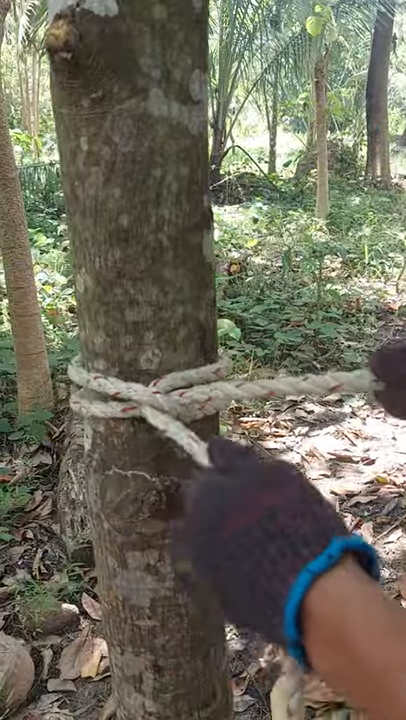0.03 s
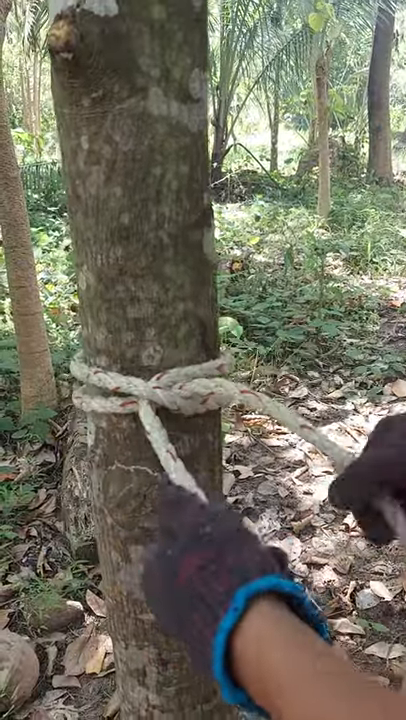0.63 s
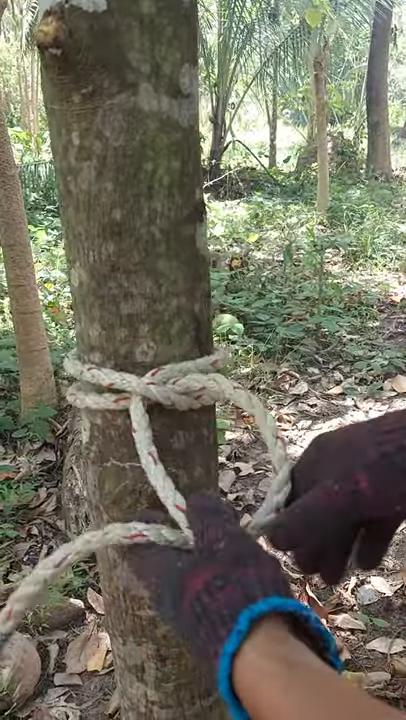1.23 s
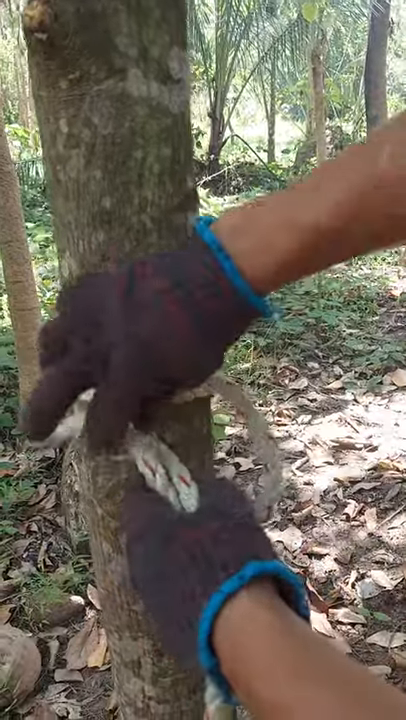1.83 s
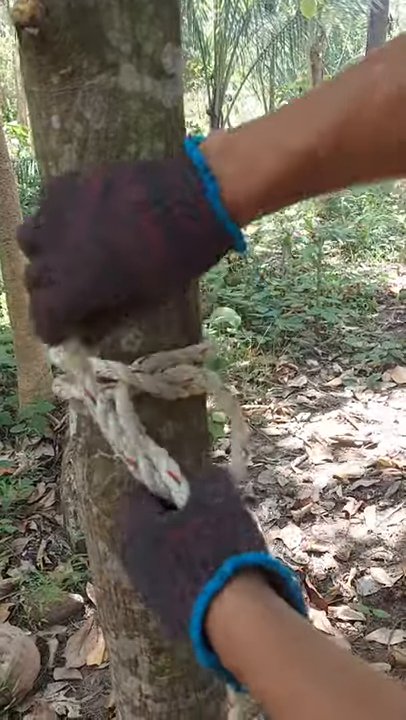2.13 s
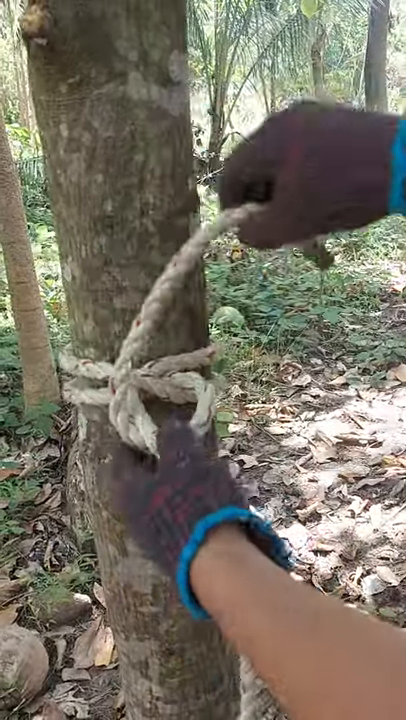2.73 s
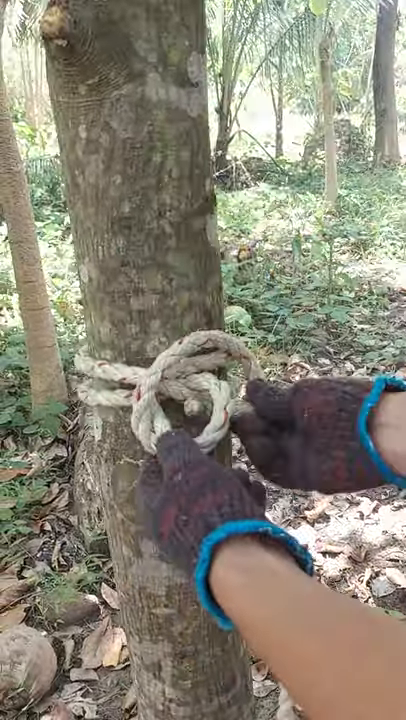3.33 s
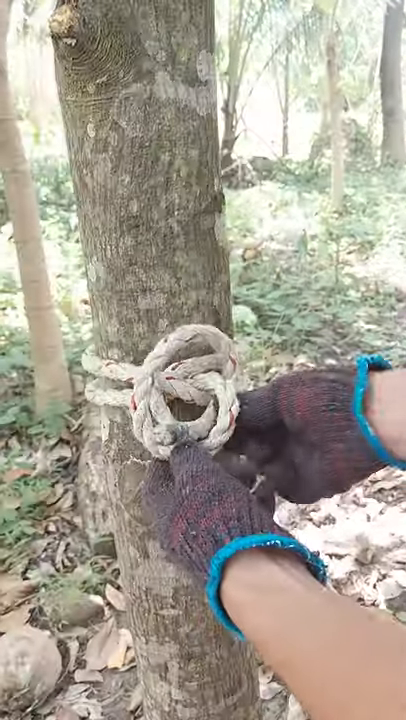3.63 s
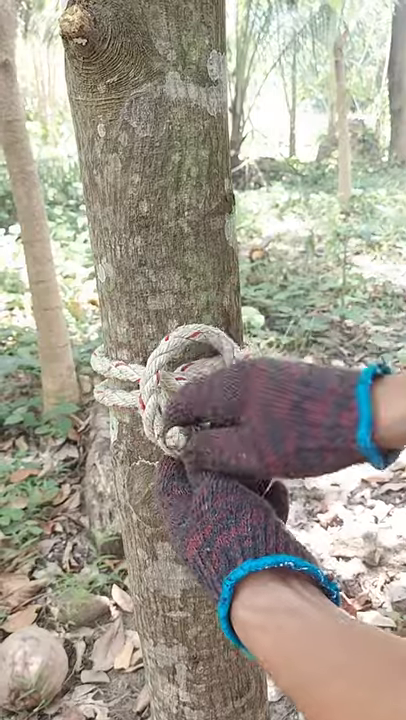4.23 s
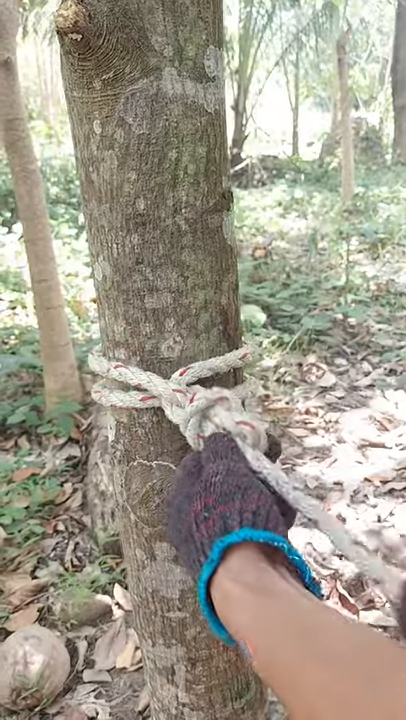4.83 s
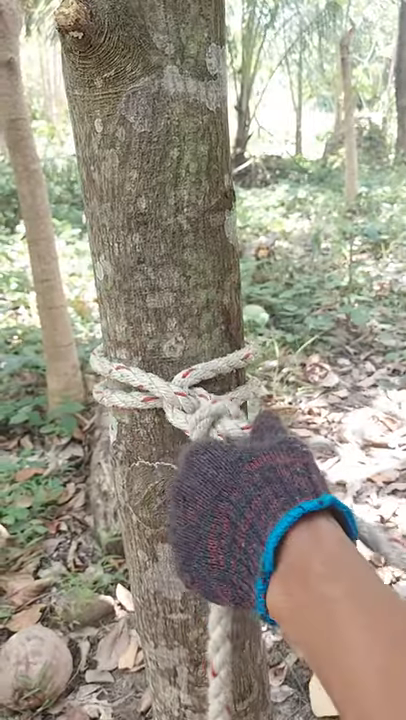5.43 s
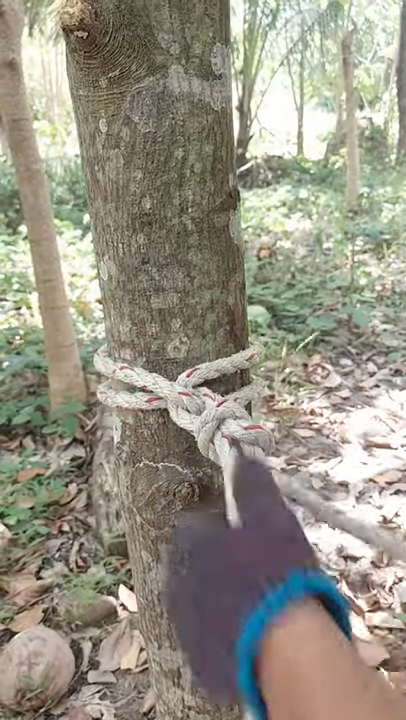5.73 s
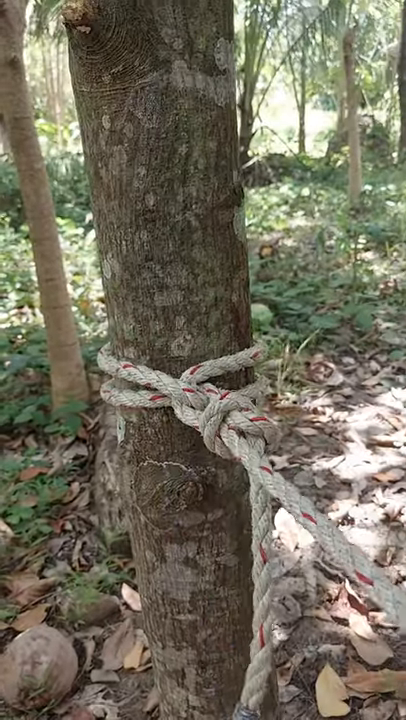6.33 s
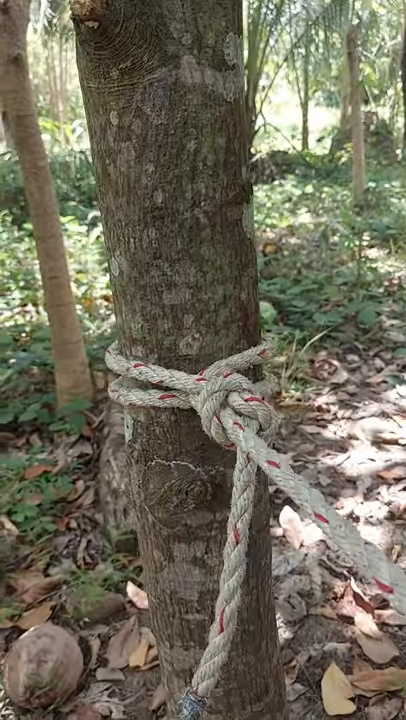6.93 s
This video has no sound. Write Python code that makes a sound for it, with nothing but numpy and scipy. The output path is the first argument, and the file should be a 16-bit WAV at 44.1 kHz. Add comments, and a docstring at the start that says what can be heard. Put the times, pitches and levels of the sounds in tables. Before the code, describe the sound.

Outdoors in a grove, air gives the microphone a few soft bumps while a distant engine, likely a motorbike, putters low. It revs in short bursts, fastest around the middle, then eases back. Nearby, gloved hands tie a rope round a trunk, making quiet rubs, swishes and small snaps that come more often as it tightens. Leaves hiss steadily, with faint insects and far birds.

```python
"""A low putter, revved in short bursts: a single-cylinder engine some way off, probably a motorbike.
Each firing rings its silencer and tailpipe, and only this low exhaust carries.
Close by, a rope is knotted round a tree: it rubs on bark and gloves and its fibres tick.
Behind, a grove's leaves hiss, insects and far birds call faintly; air now and then bumps the microphone."""
import sys
import numpy as np
from scipy import signal
from scipy.fft import rfft, irfft, next_fast_len
from scipy.io import wavfile
from scipy.ndimage import map_coordinates

SR = 44100
rng = np.random.default_rng(int(sys.argv[2]) if len(sys.argv) > 2 else 0)


def wav_out(sig):
    """Save sig, one row per channel (or a flat mono array), as 16-bit PCM at SR to the path in sys.argv[1]."""
    wavfile.write(sys.argv[1], SR, np.round(np.clip(np.atleast_2d(sig).T, -1, 1) * 32767).astype(np.int16))


N = 317079


def engine(gas_db=-21, wash_db=-12, roar_db=-17.5, rasp_db=5, load_hz=13, lead_s=0.00449):
    """Each firing rings silencer and tailpipe; an open throttle sharpens the puff into a bark."""
    # engine speed: t/s, firing rate/Hz
    revs = [(0, 22.0), (.47, 24.7), (.87, 15.7), (1.66, 18.1), (2.29, 22.4), (2.57, 31.1), (2.84, 27.3),
            (2.99, 32.3), (3.31, 23.7), (3.62, 34.3), (3.9, 33.0), (4.05, 36.2), (4.22, 30.4), (4.44, 30.1),
            (4.86, 17.6), (5.27, 22.6), (5.54, 20.8), (6.48, 25.8), (6.88, 16.9), (7.19, 17.0)]
    # tone of one sharp firing: f/Hz, level/dB
    bark_tone = [(30, -51.5), (70, -6), (110, -10.5), (145, 6), (170, 1.5), (200, -2.5), (222, -7.5),
                 (250, -6), (278, -22.5), (335, -19.5), (400, -24.5), (500, -33.5), (1200, -71)]
    # tailpipe resonance: f/Hz, level/dB
    pipe_tone = [(100, -48.5), (170, -20), (200, -3.5), (214, 11), (238, 2), (254, -5.5), (290, -41.5),
                 (500, -82)]
    # fader ride on the tailpipe's hum: t/s, level/dB
    hum_ride = [(0, -47.5), (.7, -51.5), (.9, -58.5), (1.5, -43), (2.1, -47), (2.6, -47), (3.2, -58),
                (3.65, -37.5), (4.0, -35.5), (4.2, -56), (5, -63), (6.4, -45), (6.85, -60)]
    rate, = curves(revs)
    hum_db, = curves(hum_ride)
    boom_db, bark_db, boom_hz = exhaust(rate)
    load = np.clip((bark_db - boom_db + 11) / 9, 0, 1)
    cycle = np.cumsum(rate) / SR + .5
    fired = np.flatnonzero(np.diff(np.floor(cycle)))
    unevenness = amp(-7 * load[fired])  # under load the firings are more alike
    timing, force, detune = rng.standard_normal((len(fired), 3)).T * unevenness
    at = fired + .00045 * timing * SR
    strength = amp(1.9 * force)
    notes_hz = boom_hz[fired] + load_hz * load[fired] + 3.5 * detune
    boom = held(silencer(at, strength, notes_hz, load[fired]), boom_db)
    onsets = np.clip(at - lead_s * SR, 0, N - 1).astype(int)
    pulses = unit(np.bincount(onsets, -strength, N))
    gush = unit(np.exp(-2.5 * (cycle % 1)))  # turbulent gas follows each puff out of the pipe
    gas = amp(gas_db) * gush * rng.standard_normal(N)
    bark = held(ringing(pulses + gas, bark_tone), bark_db)
    hum = held(ringing(pulses, pipe_tone), hum_db - 3)
    # trunks and ground scatter a dull wash between the puffs
    wash = hiss([(25, -56), (55, -12), (82, -13), (200, -9), (280, -28), (600, -38.5), (2000, -70)])
    wash = amp(boom_db + wash_db) * wash.mean(axis=0)
    roar = hiss([(60, -15), (200, 16), (330, -12.5), (400, -1.5), (480, -12), (630, -6.5),
                 (800, -13.5), (1200, -14), (2400, -23), (5000, -55)])
    roar *= amp(bark_db + roar_db + rasp_db * load) * (1 + 0.64 * gush)
    return (boom + bark + hum + wash) * amp([[-.4], [.4]]) + roar


def silencer(at, sizes, hz, load, idle_life_s=0.0072, load_life_s=0.0063, lead_s=0.0097):
    """Each puff sets the silencer swinging for a few cycles; strong gas flow damps it sooner."""
    out, t = np.zeros(N), np.arange(SR // 8) / SR
    lives = idle_life_s + load * (load_life_s - idle_life_s)
    for s, size, f, life in zip(at / SR, sizes, hz, lives):
        envelope = (t / life) ** 2 * np.exp(-t / life)
        add(out, s - lead_s, size * envelope * np.cos(2 * np.pi * f * (t - lead_s)))
    return out


def exhaust(rate, cruise_hz=20, pull_hz=27, full_hz=34.4):
    """Revs lift level and pitch; a wide throttle trades boom for bark, a boom swell does the reverse."""
    # how hard the engine pulls, as gain on the bark: t/s, level/dB
    effort = [(0, -3.5), (.6, -3), (1.4, -1.5), (2.0, 5), (2.55, 4), (3.3, 0), (4.0, 1.5), (4.5, 0),
              (5.05, -1), (5.7, 4.5), (6.3, 2), (6.8, -1), (7.19, -2.5)]
    effort_db, = curves(effort)
    octaves = np.log2(rate / cruise_hz)
    surge, sag_hz = booming()
    wide = np.clip((rate - pull_hz) / (full_hz - pull_hz), 0, 1) * np.clip(1 - surge, 0, 1)
    boom_db = -35.5 + 8.5 * octaves + 0.47 * effort_db - 14 * wide + 5 * surge
    bark_db = -48.5 + 12 * octaves + effort_db + 3.5 * wide - 3.5 * surge
    boom_hz = 113.5 + 17 * octaves - sag_hz
    return boom_db, bark_db, boom_hz


def booming(attack_s=0.022, release_s=0.046):
    """The low boom swells where the throttle eases or the firings meet the silencer's resonance."""
    # swells of the low boom: t/s, length/s, depth/0-1, pitch sag/Hz
    boom_swells = [(1.807, 0.22, 0.68, 3), (2.713, 0.2, 0.75, 23), (2.993, 0.31, 0.79, 19),
                   (4.089, 0.19, 0.8, 23.5), (4.405, 0.24, 0.84, 12), (6.15, 0.17, 0.86, -6),
                   (6.54, 0.23, 0.55, 22)]
    t, surge, sag_hz = np.arange(N) / SR, np.zeros(N), np.zeros(N)
    for s, length, depth, fall_hz in boom_swells:
        envelope = np.clip(np.minimum((t - s) / attack_s, (s + length - t) / release_s) + .5, 0, 1)
        surge += depth * envelope
        sag_hz += fall_hz * envelope * (t - s) / length
    return surge, sag_hz


def rope(grain_db=2.0, handling_db=-74):
    """Strands catch and slip: a coarse rub on the bark and a fine swish through the glove."""
    # pulls on the rope: t/s, length/s, rub level/dB, swish level/dB
    strokes = [(0.733, 0.088, -52, -56.5), (1.696, .12, -61, -69), (3.268, 0.28, -60, -76),
               (4.37, 0.45, -61, -68), (4.68, 0.39, -61, -61.5), (5.22, 0.18, -63, -65),
               (5.515, 0.16, -72, -57.5), (5.972, 0.19, -50, -51.5), (6.09, 0.25, -59.5, -60),
               (6.274, 0.29, -58.5, -59), (6.53, 0.22, -61, -63), (6.813, 0.29, -64, -54.5)]
    # tone of rope on bark: f/Hz, level/dB
    rub_tone = [(300, -15), (800, 3.5), (1600, 8.5), (2500, 6), (3500, 6), (5000, 4), (8000, -1),
                (15000, -47)]
    # tone of rope through the glove: f/Hz, level/dB
    swish_tone = [(1500, -30), (5000, -7), (8000, -6), (11000, -5.5), (14000, -6), (16000, -6.5)]
    rub = np.zeros(N)
    swish = amp(handling_db + 1.4 * wobble(5.5))  # the gloves never quite rest
    for s, length, rub_db, swish_db in strokes:
        stroke = swell(length, skew=0.59)
        add(rub, s, amp(rub_db) * stroke)
        add(swish, s, amp(swish_db) * stroke)
    catching = unit(amp(grain_db * wobble(600) + wobble(90) + wobble(25)))
    return catching * (rub * hiss(rub_tone) + swish * hiss(swish_tone)) * amp([[-2], [2]])


def ticks(faint_per_s=7, faint_db=-60.5, spread_db=9.5, faint_hz=9000):
    """Tiny dry snaps, each a resonance that dies at once; fainter ones come at random."""
    # snapping fibres and dry leaves: t/s, level/dB, f/Hz, width/Hz
    snaps = [(0.744, -43, 1500, 3000), (.749, -43, 3300, 700), (0.973, -48, 1190, 1000),
             (1.472, -42.5, 3450, 700), (1.476, -41.5, 5500, 1810), (1.495, -40.5, 3970, 2820),
             (1.506, -48, 6600, 1500), (2.119, -46, 1480, 2000), (4.387, -51, 8500, 6000),
             (4.743, -50, 9000, 8000), (5.539, -49, 13000, 6000), (6.021, -44, 9000, 14000),
             (6.069, -45, 4060, 2000), (6.105, -46.5, 4500, 1800), (6.333, -48, 11500, 4000),
             (6.425, -45, 7900, 7000), (6.777, -55, 11900, 8000)]
    out, t = np.zeros((2, N)), np.arange(SR // 8) / SR
    chance = rng.uniform(-1, 1, (int(faint_per_s * N / SR), 3))
    faint = [(abs(when) * N / SR, faint_db + spread_db * force, faint_hz * 2 ** (pitch / 2), faint_hz)
             for when, force, pitch in chance]
    for s, db, hz, width in snaps + faint:
        t60 = 0.029 * np.sqrt(4000 / hz)  # higher ticks die sooner
        add(out, s, amp(db - 60 * t / t60) * band(len(t), hz, width))
    return out * amp([[-2], [2]])


def air_bumps(draught_db=-58):
    """Air stirs at the microphone, mostly on the left, and now and then gives a soft low push."""
    # pushes of air: t/s, length/s, f/Hz, level/dB
    pushes = [(0, 0.15, 76, -27.5), (0.528, 0.09, 54, -35), (1.631, 0.36, 59, -39.5),
              (2.189, 0.077, 63, -35)]
    stirring = amp(draught_db + 2.5 * wobble(4))
    out = stirring * hiss([(20, -26), (45, 8), (90, -1), (200, -7), (500, -34)])
    for s, length, hz, db in pushes:
        push = unit(band(int(length * SR), hz, width=0.59 * hz)[0])
        add(out, s, amp(db) * swell(length, skew=0.75) * push)
    return out * amp([[4], [-9]])


def grove(chorus_db=-67.5):
    """Leaves hiss all round, and the insect chorus shimmers in a narrow band."""
    # fader ride on the leaves: t/s, level/dB
    leaf_ride = [(0, -53.5), (1.2, -57), (2.1, -55), (4.1, -57.5), (5.3, -58.5), (7.19, -59.5)]
    # tone of the leaves: f/Hz, level/dB
    leaf_tone = [(25, 10), (100, 18.5), (300, 4), (500, -2.5), (900, -1.5), (1350, -2.5), (1900, -2),
                 (2500, -3.5), (3200, -6.5), (4700, -8), (6200, -12.5), (9000, -16), (12000, -20),
                 (15800, -31.5)]
    ride_db, = curves(leaf_ride)
    flutter = amp(.4 * wobble(7))
    leaves = amp(ride_db + 9.5) * flutter * hiss(leaf_tone)
    shimmer = amp(chorus_db + wobble(25))
    chorus = shimmer * hiss([(5500, -54), (6550, -11), (6950, 1), (7300, 0), (7850, -6), (9500, -35)])
    return (leaves + chorus) * amp([[-.7], [.7]])


def calls(chirp_s=0.22, chirp_width_hz=900, trill_s=0.33, trill_hz=4580, trill_width_hz=220):
    """Insects and far birds call in brief swells of narrow-band noise."""
    # an insect chirping over the chorus: t/s, f/Hz, level/dB
    chirp_cues = [(0, 7270, -62), (.59, 7100, -63), (1.0, 7300, -68), (1.59, 6900, -62), (2.09, 7100, -62),
                  (2.5, 7100, -65), (2.67, 7300, -61), (3.23, 7100, -64), (4.641, 7200, -60),
                  (6.09, 7350, -64), (6.53, 6900, -58.5)]
    # a lower, narrower trill: t/s, level/dB
    trill_cues = [(0, -62), (2.68, -64), (4.68, -62), (6.11, -62)]
    # faint calls, probably far birds and insects: t/s, length/s, f/Hz, width/Hz, level/dB
    far_calls = [(2.22, .12, 15200, 900, -68), (3.601, 1, 2370, 220, -63), (6.549, 0.21, 2330, 450, -62),
                 (6.579, 0.38, 930, 250, -62), (6.895, 0.2, 2140, 454, -62)]
    out = np.zeros((2, N))
    chirps = [(s, chirp_s, hz, chirp_width_hz, db) for s, hz, db in chirp_cues]
    trills = [(s, trill_s, trill_hz, trill_width_hz, db) for s, db in trill_cues]
    for s, length, hz, width, db in chirps + trills + far_calls:
        add(out, s, amp(db) * swell(length, skew=0.76) * band(int(length * SR), hz, width))
    return out


def squeak(waver_hz=90):
    """One thin, very high tone glides up and back, wavering as it goes."""
    # the glide: t/s, f/Hz, level/dB
    glide = [(4.91, 12400, -100), (4.95, 12550, -66), (5.01, 12650, -68), (5.065, 13650, -70),
             (5.095, 12600, -75), (5.11, 12400, -100)]
    pitch_hz, db = curves(glide)
    sounding = db > max(db[0], db[-1])
    phase = 2 * np.pi * np.cumsum(pitch_hz + waver_hz * wobble(700)) / SR
    return sounding * amp(db) * np.sin(phase)


def amp(db):
    """Decibels to gain."""
    return 10 ** (np.asarray(db) / 20)


def unit(x):
    """x brought to rms 1."""
    return x / np.sqrt(np.mean(x ** 2) + 1e-20)


def along(points, hz):
    """Read (Hz, value) points on a log frequency axis."""
    f, v = np.transpose(points)
    return np.interp(np.log(hz + 1), np.log(f + 1), v)


def curves(rows):
    """One value per sample for each column after the time."""
    s, *cols = np.transpose(rows)
    return [np.interp(np.arange(N) / SR, s, c) for c in cols]


def wobble(rate):
    """A smooth random curve, rate knots a second."""
    return map_coordinates(rng.standard_normal(int(N * rate / SR) + 4), [np.arange(N) * rate / SR])


def filtered(x, response):
    """x through a zero-phase EQ whose gain is response(hz)."""
    m = next_fast_len(N + SR // 2, True)
    return irfft(rfft(x, m) * response(np.fft.rfftfreq(m, 1 / SR)), m)[..., :N]


def ringing(x, spectrum, size=16384):
    """x through a minimum-phase body with the given spectrum."""
    gain = amp(along(spectrum, np.fft.rfftfreq(size, 1 / SR)))
    cepstrum = irfft(np.log(gain))
    cepstrum[1:size // 2] *= 2
    cepstrum[size // 2 + 1:] = 0
    return signal.fftconvolve(x, irfft(np.exp(rfft(cepstrum))))[:N]


def hiss(spectrum):
    """Shaped stereo noise of rms 1, narrow in the bass and wide in the treble."""
    # stereo image: f/Hz, left-right correlation/0-1
    likeness = [(30, 0.52), (250, 0.8), (600, 0.34), (1200, 0), (10000, 0)]

    def mid_side_gains(hz):
        angle = np.arccos(np.clip(along(likeness, hz), -1, 1)) / 2
        return amp(along(spectrum, hz)) * [np.cos(angle), np.sin(angle)]

    mid, side = filtered(rng.standard_normal((2, N)), mid_side_gains)
    return unit(np.array([mid + side, mid - side]))


def band(n, hz, width):
    """n samples of stereo noise in one steep-sided resonance, rms about 1."""
    f = np.fft.rfftfreq(SR, 1 / SR)
    white = rfft(rng.standard_normal((2, SR)))
    return unit(irfft(white / (1 + ((f - hz) / width * 2) ** 4)))[:, :n]


def swell(length, skew):
    """A soft-edged rise and fall; skew under 1 brings the top forward."""
    return np.sin(np.pi * np.linspace(0, 1, int(length * SR)) ** skew) ** 2


def add(track, s, sound):
    """Mix a sound into a track from time s."""
    part = track[..., max(0, round(s * SR)):][..., :sound.shape[-1]]
    part += sound[..., :part.shape[-1]]


def held(x, db):
    """x brought to a level curve, averaged over several firings."""
    window = signal.windows.hann(SR // 4)
    power = signal.fftconvolve(x ** 2, window, "same") / signal.fftconvolve(np.ones(N), window, "same")
    return x / np.sqrt(np.abs(power) + 1e-20) * amp(db)


def scene():
    """Engine and grove at a distance, the rope close by, air on the microphone."""
    return engine() + grove() + calls() + squeak() + rope() + air_bumps() + ticks()


def record(dry, low_cut_hz=40, top_hz=15800):
    """The recorder drops the deepest bass and keeps nothing above its band limit."""
    return filtered(dry, lambda hz: (hz < top_hz) / np.sqrt(1 + (low_cut_hz / (hz + 1)) ** 6))


dry = scene()
out = record(dry)
wav_out(out)
```